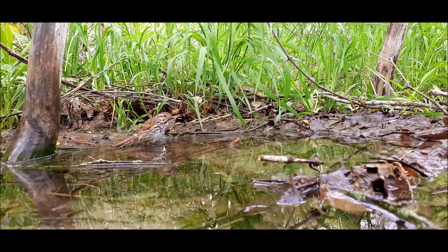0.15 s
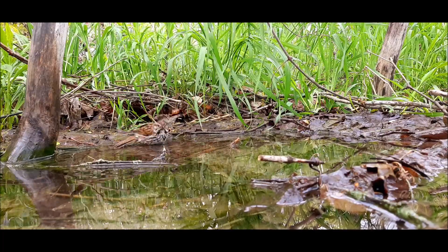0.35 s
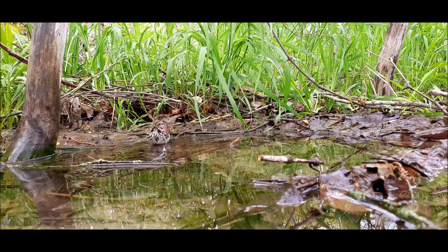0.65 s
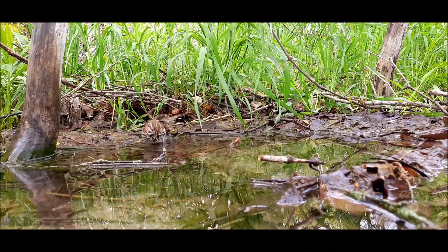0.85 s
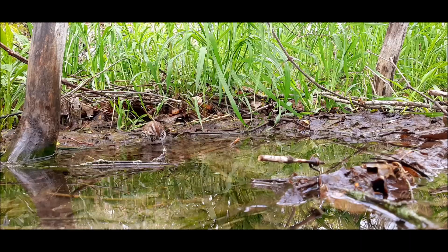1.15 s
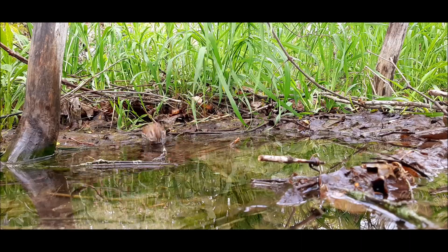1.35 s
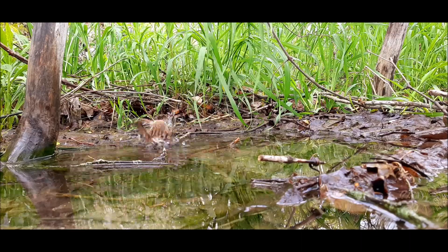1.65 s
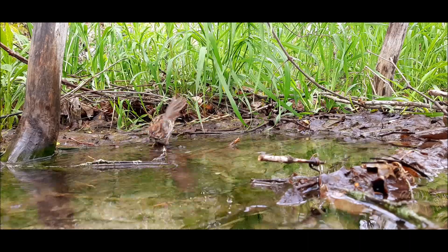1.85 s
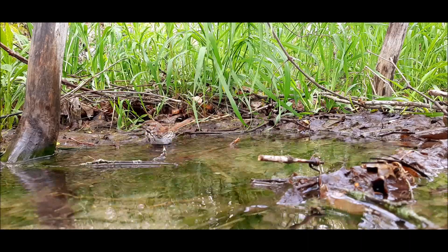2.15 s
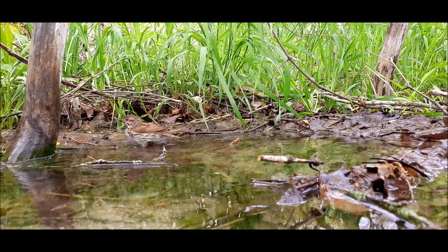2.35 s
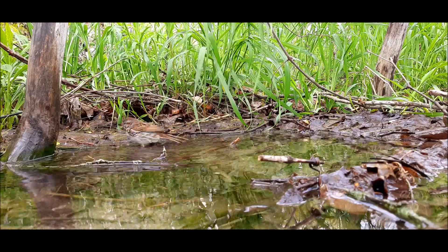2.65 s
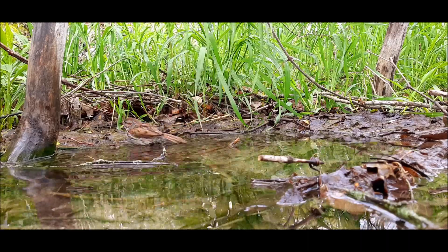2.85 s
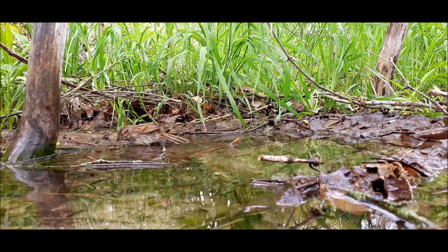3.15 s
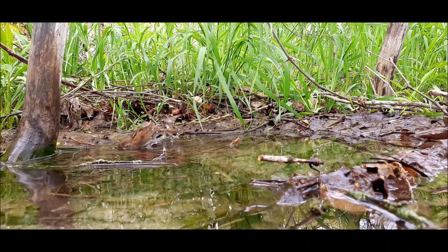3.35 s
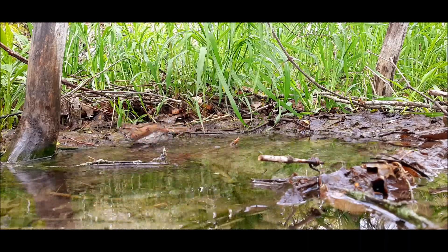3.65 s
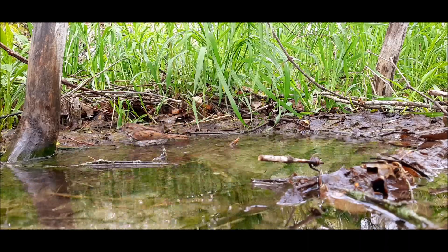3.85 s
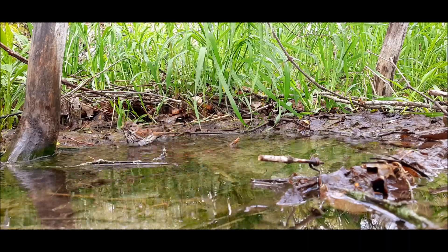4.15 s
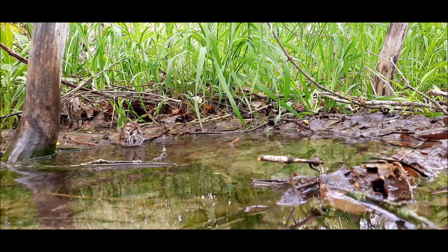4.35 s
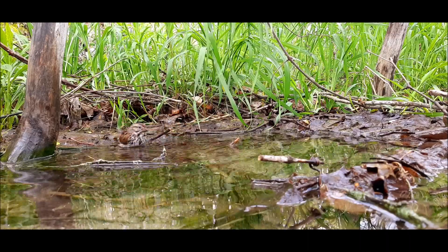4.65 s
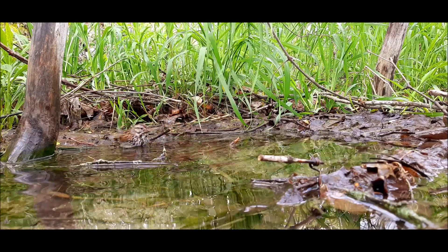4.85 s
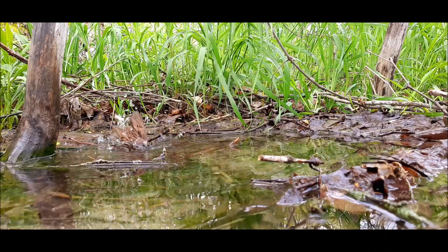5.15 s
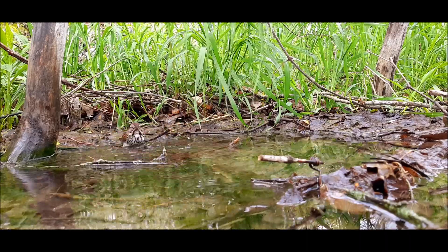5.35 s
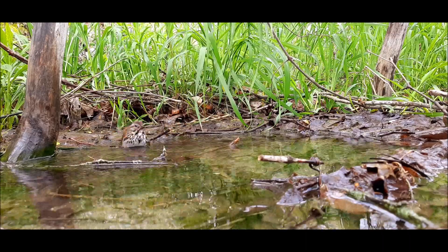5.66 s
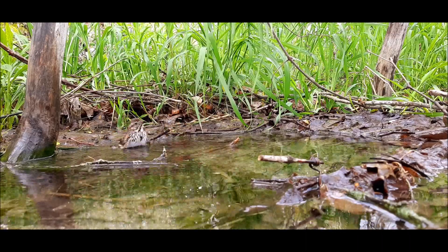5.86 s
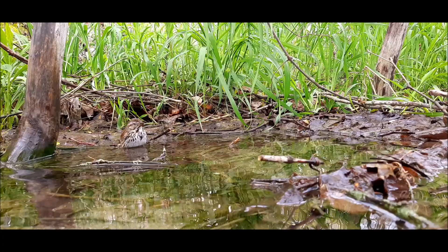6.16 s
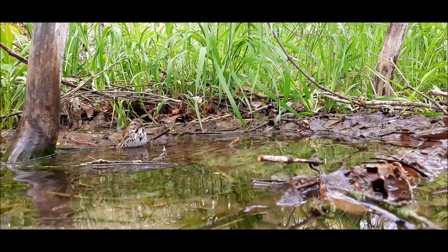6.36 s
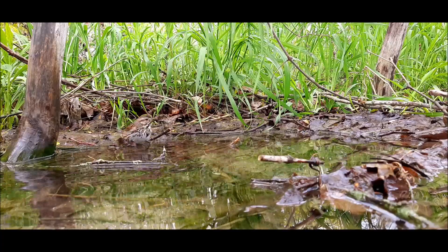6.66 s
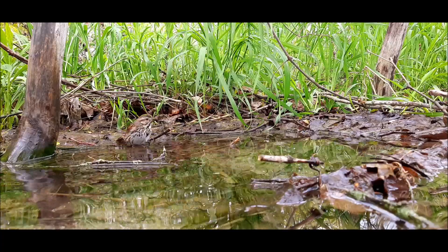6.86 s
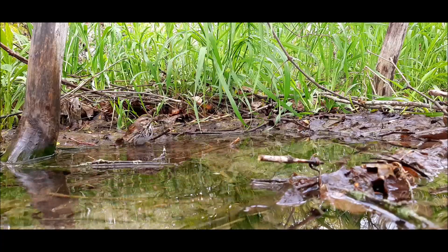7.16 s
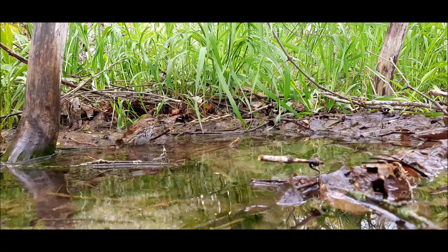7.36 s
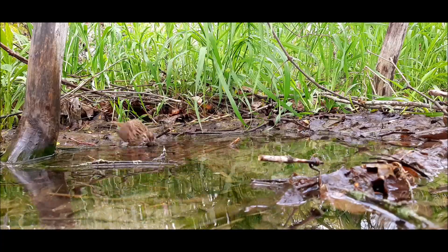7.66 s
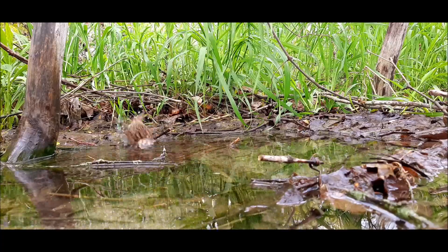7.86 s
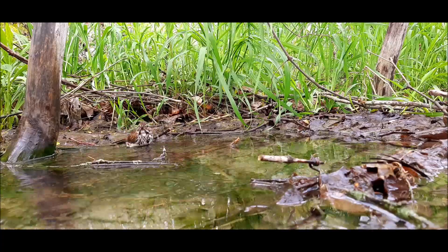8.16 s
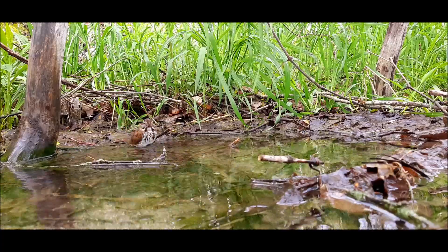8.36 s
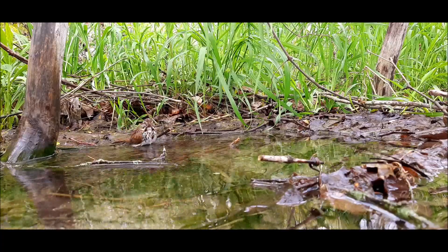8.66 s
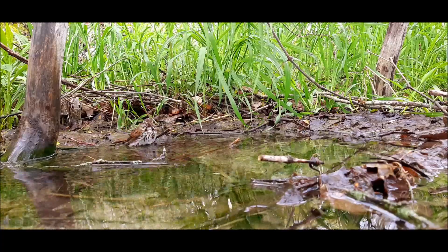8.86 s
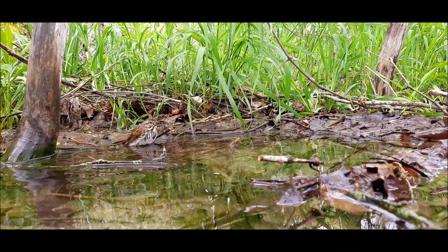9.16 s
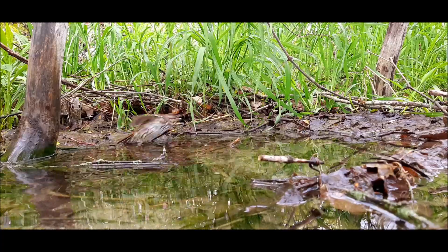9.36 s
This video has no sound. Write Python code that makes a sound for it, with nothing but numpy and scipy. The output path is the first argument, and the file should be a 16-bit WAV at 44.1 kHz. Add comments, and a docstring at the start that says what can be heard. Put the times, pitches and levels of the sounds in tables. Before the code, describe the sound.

Quiet outdoor stereo pickup beside a forest pool. A thin, very high whistle sounds early among drips, and returns three times. A sparrow slightly left beats its wings in the water in brief purring bouts, throwing crisp spray, with watery plops and ticking drops after. A short husky chirp comes later on the right, and a very faint far bird slurs downward. Soft wind rumble and hiss continue.

```python
"""At a shallow woodland pool drops, a thin, arched whistle and small splashes open; three more whistles follow.
From 1.5 s a sparrow's wingbeat bouts, slightly left, shape noise showers into spray and slosh.
Short noise ticks and decaying sines make drops and plops; a far bird slurs, a husky chirp comes at 6.4 s.
Trunks and leaves scatter the birds' calls as decaying noise echoes.
Throughout lie a low rumble of light wind, a distant wavering hum and a faint hiss."""
import sys
import numpy as np
from scipy import signal
from scipy.fft import rfft, irfft, next_fast_len
from scipy.io import wavfile
from scipy.ndimage import map_coordinates

SR = 44100
rng = np.random.default_rng(int(sys.argv[2]) if len(sys.argv) > 2 else 0)


def master_out(mix):
    """Clip the mix to full scale and print it as 16-bit PCM to the path in sys.argv[1]."""
    frames = np.transpose(np.atleast_2d(mix))
    ceiling = np.clip(frames, -1, 1)
    pcm = np.round(ceiling * 32767).astype(np.int16)
    wavfile.write(sys.argv[1], SR, pcm)


N = 418950  # samples, 9.5 s

# Levels in the tables are nominal: the functions add the trims between the parts of a sound.
# Bouts of wingbeats, slower when bathing, quicker when shaking off:
# (first beat [s], last beat [s], rate [beats/s], spray at start [dB], middle [dB] and end [dB],
#  extra level of last beat [dB], nominal fade [s], slosh relative to spray [dB])
WINGBEAT_BOUTS = [(1.489, 1.799, 16, -71, -56, -59, 10, 0.027, -10.5),
                  (3.287, 3.627, 15, -65, -59, -61.5, 0.5, 0.029, -10),
                  (4.982, 5.352, 16, -67, -55, -55.5, 4, .031, -8),
                  (5.504, 5.935, 21, -67.5, -60, -64, 0.5, 0.013, -7.5),
                  (7.655, 8.081, 14, -71, -56, -60.5, 9, .031, -10.5),
                  (8.417, 8.611, 21, -63, -63.5, -66, 0, 0.013, -6)]
# Further splashes, between and within the bouts:
# (time [s], spray level [dB], nominal fade [s], slosh relative to spray [dB])
EXTRA_SPLASHES = [(.666, -62, 0.026, -13), (.7, -63.5, .026, -9.5), (1.572, -69, 0.033, -11.5),
                  (1.7, -64, 0.035, -10), (2.008, -57, 0.01, -18), (2.046, -66, 0.049, -3.5),
                  (2.401, -56, 0.035, -15.5), (2.8, -72, 0.064, -13), (2.91, -71.5, 0.05, -23),
                  (3.671, -55.5, .018, -10), (3.697, -63, .025, -13), (4.379, -69.5, 0.036, -8.5),
                  (5.317, -50.5, 0.052, -17), (8.272, -71.5, .012, -4), (8.32, -68.5, .015, -9)]
BEAT_SCATTER_DB = 0.77  # no two beats of a bout are equally strong
WING_LAG_S, WING_IMBALANCE_DB = .011, 1.5  # mean delay between the wings; spread of their strengths

# Water running off the feathers: level after a 0 dB stroke, dB gained per dB of stroke, fade time
PATTER_DB, PATTER_GROWS, PATTER_FADE_S = -45, 0.54, .22

# Single drops, loud and faint:
# (time [s], peak level [dB], ring pitch [Hz], fine treble relative to peak [dB], left over right [dB])
TIMED_DROPS = [(.1012, -54.5, 7660, 4, -1.5), (.2834, -65.5, 7500, 7.5, 2), (.6584, -51, 7600, 7.5, -1),
               (.6918, -36.5, 7800, -5.5, 3.5), (1.6112, -50, 7500, -9, -1.5),
               (1.7429, -45, 2060, -10, -0.5), (1.7923, -44, 6540, -8, 1), (1.8003, -39, 2090, -9, 1.5),
               (1.8084, -42, 2050, -8, 1.5), (2.0413, -27, 2240, -29.5, 2),
               (2.0444, -33.5, 4660, -24.5, -1), (2.0885, -57.5, 7700, -4, 0), (2.1814, -62, 7800, 5, -1),
               (2.3885, -44.5, 7180, 3, -2), (3.3418, -49.5, 7230, -6, -1.5), (3.3533, -47, 7200, -7, -2),
               (3.4131, -48, 7600, -6.5, -2.5), (3.4502, -58, 7400, 4.5, -3), (3.4674, -53, 7400, 4, -1),
               (3.5379, -53, 3600, -10.5, 6), (3.6287, -48.5, 7250, -2.5, -.5),
               (3.6702, -45, 4200, -4.5, .5), (3.7828, -66, 7600, 7.5, -2), (4.3685, -54, 7850, -1, -1.5),
               (4.4323, -60, 7330, 8.5, -1.5), (4.9926, -51, 7670, -10, -1), (5.0412, -39.5, 6940, -11, -2),
               (5.1052, -38, 7440, -7.5, -1.5), (5.1881, -49, 5710, -13.5, 1),
               (5.3082, -31, 6000, -17, -2.5), (5.3654, -39.5, 3680, -14, 3), (5.5535, -54, 6600, -12, -3),
               (5.6506, -49, 7700, -2.5, -3), (5.688, -45.5, 6460, -8.5, -2.5),
               (5.8272, -48, 6800, -7, -1.5), (5.8411, -45.5, 7300, -5.5, 1), (5.9948, -53, 7470, -1, -0.5),
               (7.656, -55, 6000, -12, 1), (7.7867, -45.5, 7840, -12, -1.5),
               (7.8067, -45.5, 7010, -12, 0.5), (7.8251, -46.5, 5800, -17.5, -2.5),
               (7.8785, -41.5, 7040, -12, -3), (7.8984, -46, 6500, -13, -1.5), (8.1064, -43, 3480, -8, 3.5),
               (8.115, -30, 7240, -14.5, -7.5), (8.1214, -39.5, 7550, -22.5, -1.5),
               (8.1794, -64, 7390, 7, -1), (8.3654, -49.5, 5300, -20, -10), (8.424, -51, 7300, -7, -1),
               (8.5155, -53, 7230, -4, -1), (8.5635, -57.5, 1520, -9, 0)]
DROP_TICK_DB, DROP_FINE_DB, DROP_RING_DB = -5.5, 4.5, -2  # trims of the three parts of a drop
DROP_RING_CYCLES, DROP_RISE_S = 3, .001  # cycles in which the ring fades; time from touch to peak

# Drops thrown up by the strokes: longest flight, then peak over the stroke's spray, its spread, treble
FALLBACK_S, FALLBACK_DB, FALLBACK_SPREAD_DB, FALLBACK_TREBLE_DB = 0.087, 2, 2, -4
FALLBACK_LOSS_DB = 14.5  # lost over the longest flight: the drops that fly longest are the smallest
FALLBACK_HZ, FALLBACK_PAN_DB = 6000, 3.5  # central pitch; how widely they land

# Slaps and gulps of water: (time [s], level [dB], pitch [Hz], width [Hz], fade [s])
WATER_SLAPS = [(0.298, -62.5, 2390, 412, 0.015), (0.649, -55.5, 3540, 2400, 0.026),
               (0.658, -57, 2620, 400, .008), (0.691, -59, 2620, 450, 0.0063),
               (1.32, -69.5, 1940, 400, 0.042), (1.567, -62, 1590, 220, 0.042),
               (1.801, -42, 2700, 1296, 0.014), (2.043, -43, 2750, 1500, 0.0034),
               (2.416, -59, 1503, 1120, 0.028), (2.784, -50, 2510, 493, 0.0057),
               (3.056, -62.5, 4470, 900, 0.0057), (4.795, -62, 1300, 540, 0.014),
               (5.902, -64.5, 407, 340, 0.04), (5.942, -60.5, 330, 220, 0.025),
               (6.828, -58, 1346, 1100, 0.0057)]
# Short decaying sine tones: (time [s], level [dB], pitch [Hz], 60 dB decay [s], swell [s])
PLOP_TONES = [(0.694, -45, 2550, 0.03, 0.0016), (1.344, -60.5, 1552, 0.069, 0.0044),
              (1.553, -35, 2060, 0.061, 0.02), (1.733, -47, 2085, 0.11, 0.0098),
              (1.74, -55, 1535, .1, .004), (1.803, -46.5, 2070, 0.077, 0.0046),
              (1.804, -46, 1530, 0.037, 0.0034), (2.015, -44.5, 2026, 0.066, 0.0098),
              (2.418, -54.5, 2028, 0.05, 0.0022), (2.421, -51, 1033, 0.028, 0.0018),
              (2.43, -59, 697, 0.07, 0.0025), (4.793, -48, 1157, 0.047, 0.003),
              (6.828, -45.5, 1067, 0.04, 0.0037)]

# Spectral shapes of the splash and tick noise, relative only: (frequency [Hz], density [dB/Hz])
SPRAY_SPECTRUM = [(1200, -31), (2400, -17), (3200, -3.5), (4500, 1.5), (7500, 5.5), (9000, -8.5),
                  (12000, 4.5), (15800, -3)]
SLOSH_SPECTRUM = [(200, -9.5), (600, -10.5), (1100, -7.5), (1400, -3), (1540, 6), (1720, -8), (2100, 1),
                  (2500, -1.5), (3200, -4.5), (6000, -33.5)]
TICK_SPECTRUM = [(600, -44), (1200, -31.5), (2300, -9), (3500, -3), (7500, 5), (9000, -12.5),
                 (16000, -27.5)]
FINE_TICK_SPECTRUM = [(1000, -62.5), (4000, -28.5), (8000, -12), (12000, 2.5), (15800, -3)]

# Arched whistles: (time [s], length [s], top pitch [Hz], share of the pitch lost by the end [1],
#  power of time in that fall [1], mean level [dB], left over right [dB], fade [dB/s])
ARCHED_WHISTLES = [(.333, 0.52, 10060, 0.19, 4.4, -39, -1, 113),
                   (2.138, .53, 9977, .14, 3.55, -40.5, -2.5, 127),
                   (5.073, .54, 9962, .185, 4.6, -38.5, 0.3, 127),
                   (8.818, 0.52, 10100, 0.2, 5.04, -41, -1.5, 158)]
WHISTLE_ATTACK_S, WHISTLE_HOLD_SHARE = 0.11, 0.54  # the hold share is where the fade begins
WHISTLE_SCOOP, WHISTLE_SCOOP_S = 0.12, .027  # share of pitch it starts under the top; time to close in

CHIRP_S, CHIRP_LENGTH_S, CHIRP_DB = 6.443, 0.05, -45
CHIRP_LOW_HZ, CHIRP_TOP_HZ = 1506, 1942  # nominal pitch at both ends and at the crest
CHIRP_ECHO_S, CHIRP_ECHO_DB = .0105, -10  # a nearby trunk returns it
# The throat that shapes the chirp: (frequency [Hz], relative level [dB])
THROAT_SPECTRUM = [(1000, -41), (1600, -16), (1950, -15.5), (2350, -14.5), (3000, -6), (3650, 0),
                   (4000, -4.5), (4300, -8), (4900, -15), (5550, -7), (5900, -18), (6300, -35), (7600, -29),
                   (8300, -41)]

# Thin falling notes of a far bird: (time [s], length [s], start pitch [Hz], end pitch [Hz], level [dB])
FAR_BIRD_NOTES = [(1.109, 0.068, 7700, 7030, -85.5), (4.269, 0.074, 7900, 6900, -78.5),
                  (7.189, 0.067, 7840, 6910, -78.5), (8.942, 0.12, 7800, 6300, -77.5)]
# Reverberation of the trees: (frequency [Hz], 60 dB decay [s])
WOODS_DECAY = [(200, 0.24), (2000, 0.35), (8000, 0.39), (16000, 0.22)]

# Course of the wind rumble: (time [s], level [dB])
RUMBLE_LEVEL = [(0.0, -64.5), (0.02, -54.5), (0.32, -64.5), (0.53, -52), (0.98, -62.5), (2.22, -59.5),
                (2.411, -55), (2.43, -51.5), (2.72, -64.5), (3.15, -60.5), (4.66, -66), (5.4, -58),
                (5.66, -65.5), (6.64, -68.5), (6.9, -75.5), (6.98, -70), (9.229, -66.5), (9.5, -76)]
# Spectral shapes of the low rumble and the faint hiss, relative only: (frequency [Hz], density [dB/Hz])
RUMBLE_SPECTRUM = [(20, -41.5), (32, -22.5), (50, -3.5), (65, -2.5), (88, 2), (115, -5.5), (140, -7),
                   (200, -18.5), (300, -27.5), (500, -44), (1200, -51.5)]
HISS_SPECTRUM = [(100, 13), (400, 6.5), (800, 1.5), (1300, 0), (1550, 2.5), (1800, -1), (3000, -3),
                 (5000, -4.5), (7600, -5.5), (8600, -23), (10300, -9), (12000, -0.5), (15500, 2.5)]
# Left-right difference in the rumble: (frequency [Hz], relative level [dB])
RUMBLE_SIDE = [(70, -16.5), (140, -11.5), (300, -3.5)]

TOP_HZ = 16150  # band limit of the recorder


def bath():
    """The splashing, a little to the left of the microphones, with the bank close behind it."""
    beats = strokes()
    splash = wings(beats) + patter(beats) + drops(TIMED_DROPS + fallback(beats)) + slaps()
    tones = plops()
    direct = splash + placed(tones, lead_ms=.135, pan_db=1.5)
    bank = amp(-9.0) * scatter(splash[0] + tones, t60=0.08)
    return direct + bank + amp(-30) * woods(splash[1])


def strokes():
    """Strokes as (s, spray dB, fade s, slosh dB): bouts beat evenly on one arc of effort, some end heavily."""
    rows = list(EXTRA_SPLASHES)
    for first, last, rate, start_db, middle_db, end_db, extra_db, fade, slosh_db in WINGBEAT_BOUTS:
        u = np.linspace(0, 1, round((last - first) * rate) + 1)
        arc = np.polyfit([0, .5, 1], [start_db, middle_db, end_db], 2)
        effort_db = np.polyval(arc, u) + extra_db * (u == 1)
        effort_db += BEAT_SCATTER_DB * rng.standard_normal(len(u))
        times = first + (last - first) * u
        rows += [(s, db, fade, slosh_db) for s, db in zip(times, effort_db)]
    return rows


def wings(beats):
    """Two wings hit just apart; each swells fast and fades: fine spray over the slosh of the water."""
    t = np.arange(-SR // 10, SR // 4) / SR
    spray_power, slosh_power = np.zeros((2, N))
    for s, db, fade, slosh_db in beats:
        lag = WING_LAG_S * (.5 + rng.random())
        ages = t + np.array([[lag], [-lag]]) / 2
        weights = unit(amp(WING_IMBALANCE_DB * rng.standard_normal((2, 1))))
        # the rise is 2.8 times as fast as the fade
        decay = np.exp(-np.where(ages > 0, ages, -2.8 * ages) / (0.86 * fade))
        swell = np.linalg.norm(weights * decay, axis=0) * amp(-1.5)
        add(spray_power, s + t[0], (amp(db) * swell) ** 2)
        add(slosh_power, s + t[0], (amp(db + slosh_db) * swell) ** 2)
    shower = droplets(rate=2000, spread_db=4.2, mist_db=-8.5)
    spray = spread(coloured(shower, SPRAY_SPECTRUM), alike=0.12)
    slosh = spread(coloured(shower, SLOSH_SPECTRUM), alike=0.97)
    beads = fizz(rate=260, low_hz=2600, high_hz=8000, cycles=7, spread_db=5)
    spray = amp(-1) * spray + amp(-7) * placed(beads, lead_ms=.155, pan_db=0)
    clumps = unit(amp(2 * wobble(330)))  # drops land in small clusters
    # rows are left and right: spray leans right, slosh leans left
    spray = amp([[0], [1.5]]) * np.sqrt(spray_power) * spray
    slosh = amp([[1.5], [0]]) * np.sqrt(slosh_power) * slosh
    return clumps * (spray + slosh)


def droplets(rate, spread_db, mist_db):
    """Three steady showers of tiny impacts of uneven size, over a mist too fine to resolve."""
    when, size, sign = rng.random((int(3 * rate * N / SR), 3)).T
    size = amp(-spread_db * np.log(np.maximum(1 - size, .02))) * np.sign(sign - .5)
    impacts = np.bincount((when * 3 * N).astype(int), size, 3 * N).reshape(3, N)
    return unit(impacts) + amp(mist_db) * rng.standard_normal((3, N))


def fizz(rate, low_hz, high_hz, cycles, spread_db):
    """A steady scatter of tiny bubbles, each ringing a few cycles at its own pitch, rms 1."""
    when, pitch, size = rng.random((int(rate * N / SR), 3)).T
    k = np.arange(256)  # samples of one bubble
    pitch_hz = low_hz * (high_hz / low_hz) ** pitch
    turns = pitch_hz[:, None] * k / SR
    size = amp(-spread_db * np.log(np.maximum(1 - size, .05)))
    ring = np.sin(2 * np.pi * turns) * np.exp(-turns / cycles)
    grains = size[:, None] * ring * (1 - k / len(k))
    places = (when * N).astype(int)[:, None] + k
    return unit(np.bincount(places.ravel(), grains.ravel(), N)[:N])


def patter(beats):
    """Water drips from the feathers after each stroke: sparse, uneven ticks that outlast the bout."""
    t = np.arange(SR // 2) / SR
    fade = np.exp(-t / PATTER_FADE_S) * (1 - t / t[-1])
    power = np.zeros(N)
    for s, db, _, _ in beats:
        add(power, s, (amp(PATTER_DB + PATTER_GROWS * db) * fade) ** 2)
    ticks = coloured(droplets(rate=170, spread_db=4.5, mist_db=-14), SPRAY_SPECTRUM)
    return np.sqrt(power) * spread(ticks, alike=.5)


def fallback(beats):
    """Each stroke throws up one drop that lands a moment later; rows have the columns of TIMED_DROPS."""
    flights = rng.random(len(beats))
    chances = rng.standard_normal((len(beats), 3))
    rows = []
    for (s, db, _, _), flight, (size, pitch, place) in zip(beats, flights, chances):
        peak_db = db + FALLBACK_DB - FALLBACK_LOSS_DB * flight + FALLBACK_SPREAD_DB * size
        hz = FALLBACK_HZ * (1 + 0.42 * np.tanh(pitch))
        rows.append((s + FALLBACK_S * flight, peak_db, hz, FALLBACK_TREBLE_DB, FALLBACK_PAN_DB * place))
    return rows


def drops(rows):
    """A drop striking water ticks for about a millisecond, with fine treble, and rings at its own pitch and place."""
    t = np.arange(-SR // 200, SR // 50) / SR
    out = np.zeros((2, N))
    age = np.where(t > 0, t, -3 * t)  # rises three times as fast as it fades
    shape = np.exp(-age / .0008) + .07 * np.exp(-age / .005)
    for s, db, hz, treble_db, pan_db in rows:
        sides = amp(np.array([[1], [-1]]) * pan_db / 2)
        sides = amp(db) * sides / sides.mean()
        parts = ((DROP_TICK_DB, TICK_SPECTRUM), (treble_db + DROP_FINE_DB, FINE_TICK_SPECTRUM))
        for level_db, spectrum in parts:
            tick = coloured(shape * rng.standard_normal((3, len(t))), spectrum)
            tick *= np.linalg.norm(shape) / np.linalg.norm(tick, axis=1, keepdims=True)
            add(out, s + DROP_RISE_S + t[0], sides * amp(level_db) * spread(tick, alike=0.39))
        ring = placed(plip(hz), lead_ms=0.11, pan_db=1)
        add(out, s + DROP_RISE_S / 2, sides * amp(DROP_RING_DB) * ring)
    return out


def plip(hz):
    """A drop closes a cavity that rings for a few cycles, peak 1; so small a source radiates no bass."""
    turns = hz * np.arange(SR // 50) / SR
    ring = np.exp(-turns / DROP_RING_CYCLES) * np.sin(2 * np.pi * turns)
    band = signal.butter(3, [.75 * hz, min(2 * hz, 8400)], "bandpass", fs=SR, output="sos")
    ring = signal.sosfilt(band, ring)
    return ring / np.abs(ring).max()


def slaps():
    """A pocket of water opens and closes: a short, blunt, half-pitched sound from resonant noise."""
    t = np.arange(SR // 5) / SR
    hz = np.fft.rfftfreq(len(t), 1 / SR)
    out = np.zeros((3, N))
    for s, db, pitch_hz, width_hz, fade in WATER_SLAPS:
        resonance = 1 / (1 + (2 * (hz - pitch_hz) / width_hz) ** 2)
        bass_cut = hz ** 2 / (hz ** 2 + (pitch_hz / 2) ** 2)
        shape = np.exp(-t / fade) * (1 - np.exp(-10 * t / fade))
        ring = irfft(rfft(rng.standard_normal((3, len(t)))) * resonance * bass_cut) * shape
        ring *= np.linalg.norm(shape) / np.linalg.norm(ring, axis=1, keepdims=True)
        add(out, s, amp(db - 3.5) * ring)
    return spread(out, alike=0.85)


def plops():
    """Each tone rings at one slightly unsteady pitch, swelling and then dying away."""
    t = np.arange(SR // 6) / SR
    out = np.zeros(N)
    for s, db, hz, t60, swell in PLOP_TONES:
        drift = .022 * np.cumsum(rng.standard_normal(len(t)))  # phase in radians
        envelope = amp(-60 * t / t60) * (1 - np.exp(-t / swell))
        add(out, s, amp(db) * envelope * np.sin(2 * np.pi * hz * t + drift))
    return out


def whistles():
    """A pure tone rises, holds and sinks ever faster; its echoes beat against it wherever it glides."""
    out = np.zeros((2, N))
    for s, length, top_hz, sag, power, db, pan_db, fade_db in ARCHED_WHISTLES:
        u = np.linspace(0, 1, int(length * SR))
        scoop = WHISTLE_SCOOP * np.exp(-u * length / WHISTLE_SCOOP_S)
        hz = top_hz * (1 - scoop - sag * u ** power + .0007 * wobble(45, size=len(u)))
        attack = np.minimum(u * length / WHISTLE_ATTACK_S, 1) ** 1.29
        release = amp(-fade_db * length * np.maximum(u - WHISTLE_HOLD_SHARE, 0))
        release *= np.minimum((1 - u) / 0.12, 1)
        tremor = amp(.7 * wobble(130, size=len(u)))
        tone = attack * release * tremor * np.sin(2 * np.pi * np.cumsum(hz) / SR)
        tone = np.pad(tone, (0, SR // 4))  # room for the echoes
        heard = tone + amp(-9) * scatter(tone, t60=0.22) + amp(-16) * woods(tone)
        heard /= np.sqrt(np.sum(heard ** 2, axis=1, keepdims=True) / len(u))
        add(out, s, amp(db) * placed(heard, lead_ms=-0.014, pan_db=pan_db))
    return out


def chirp():
    """A husky note from the right rises and falls in pitch; its echo beats on the glide as a fine warble."""
    t = np.arange(SR // 3) / SR
    u = np.clip(t / CHIRP_LENGTH_S, 0, 1)
    hz = CHIRP_LOW_HZ + (CHIRP_TOP_HZ - CHIRP_LOW_HZ) * np.sin(np.pi * u) ** 2
    hz = hz * (1 + .016 * wobble(600, size=len(t)))
    phase = 2 * np.pi * np.cumsum(hz) / SR
    voice = unit(sum(np.sin(k * phase) for k in range(1, 5)))
    husk = amp(-7) * rng.standard_normal(len(t))
    quaver = amp(2.6 * wobble(330, size=len(t)))
    swell = np.abs(np.sin(np.pi * u ** 1.47)) ** 0.75
    note = coloured((voice + husk) * swell * quaver, THROAT_SPECTRUM)
    note *= amp(CHIRP_DB) * np.sqrt(np.mean(swell ** 2))
    direct = placed(note, lead_ms=-.27, pan_db=-9) * amp(-1.5)
    out = np.zeros((2, N))
    add(out, CHIRP_S, direct + amp(-7) * scatter(note, t60=.16) + amp(-29) * woods(note))
    add(out, CHIRP_S + CHIRP_ECHO_S, amp(CHIRP_ECHO_DB) * direct)
    return out


def far_bird():
    """Faint downward slurs of pure tone, blurred by the trees."""
    out = np.zeros(N)
    for s, length, start_hz, end_hz, db in FAR_BIRD_NOTES:
        u = np.linspace(0, 1, int(length * SR))
        hz = start_hz + (end_hz - start_hz) * u
        add(out, s, amp(db) * np.sin(np.pi * u) * np.sin(2 * np.pi * np.cumsum(hz) / SR))
    return woods(out)


def air():
    """Wind rumble, most alike on both sides in the deep bass, a wavering far hum and an even hiss."""
    level = amp(np.interp(clock(), *np.transpose(RUMBLE_LEVEL)) + 1.2 * wobble(8.2))
    mid, side = coloured(rng.standard_normal((2, N)), RUMBLE_SPECTRUM)
    side = filtered(side, lambda hz: amp(along(RUMBLE_SIDE, hz)))
    rumble = amp(-0.5) * np.array([mid + side, mid - side])
    waver = .9 * wobble(5)  # phase in radians
    hum = amp(-72.5 + 1.2 * wobble(2.3)) * np.sin(2 * np.pi * 86 * clock() + waver)
    hiss = amp(-74.5) * coloured(rng.standard_normal((2, N)), HISS_SPECTRUM)
    return level * rumble + hum + hiss


def scatter(x, t60):
    """Dense early echoes from the surroundings: decaying noise, different on each side."""
    t = np.arange(SR // 6) / SR
    echoes = rng.standard_normal((2, len(t))) * amp(-60 * t / t60)
    echoes /= np.linalg.norm(echoes, axis=1, keepdims=True)
    return signal.oaconvolve(x[None], echoes, axes=1)[:, :len(x)]


def woods(x):
    """The diffuse answer of the trees: noise that dies away at its own speed in each band."""
    hz, t, z = signal.stft(rng.standard_normal((2, SR // 3)), SR, nperseg=256)
    decay = amp(-60 * t / along(WOODS_DECAY, hz)[:, None])
    tail = signal.istft(z * decay, SR, nperseg=256)[1]
    return signal.oaconvolve(x[None], tail / np.linalg.norm(tail[0]), axes=1)[:, :len(x)]


def placed(x, lead_ms, pan_db):
    """Mono to stereo: the left side hears it earlier and louder by these amounts."""
    side = np.array([[1], [-1]]) / 2
    lead_s = side * lead_ms / 10 ** 3
    return amp(side * pan_db) * filtered(x, lambda hz: np.exp(2j * np.pi * hz * lead_s))


def spread(three, alike):
    """One shared sound, arriving left first, and one of each side's own, mixed to the given likeness."""
    alike = np.clip(alike, 0, 1)
    shared = placed(three[0], lead_ms=0.16, pan_db=-0.5)
    return np.sqrt(alike) * shared + np.sqrt(1 - alike) * three[1:]


def amp(db):
    """Decibels to gain."""
    return 10 ** (np.asarray(db) / 20)


def unit(x):
    """Scaled to rms 1."""
    return x / np.sqrt(np.mean(x ** 2) + 1e-20)


def clock():
    """The time of every sample in seconds."""
    return np.arange(N) / SR


def along(points, hz):
    """Values between (Hz, value) points on a log frequency axis."""
    f, v = np.transpose(points)
    return np.interp(np.log(hz + 1), np.log(f), v)


def filtered(x, response):
    """x times a complex response of frequency."""
    n = x.shape[-1]
    m = next_fast_len(n + SR // 10, True)
    return irfft(rfft(x, m) * response(np.fft.rfftfreq(m, 1 / SR)), m)[..., :n]


def coloured(x, spectrum):
    """x shaped by the given spectrum, at rms 1."""
    return unit(filtered(x, lambda hz: amp(along(spectrum, hz))))


def wobble(rate, size=N):
    """A smooth random curve, rate knots a second."""
    coarse = np.arange(0, size + 16, 16)
    knots = rng.standard_normal(int(size * rate / SR) + 4)
    curve = map_coordinates(knots, [coarse * rate / SR])
    return np.interp(np.arange(size), coarse, curve)


def add(track, s, sound):
    """Mix a sound into a track at time s."""
    part = track[..., max(round(s * SR), 0):][..., :sound.shape[-1]]
    part += sound[..., :part.shape[-1]]


def scene():
    """Pool, birds and air together."""
    return bath() + whistles() + chirp() + far_bird() + air()


def record(dry):
    """The recorder keeps nothing above its band limit."""
    return filtered(dry, lambda hz: hz < TOP_HZ)


dry = scene()
out = record(dry)
master_out(out)
```